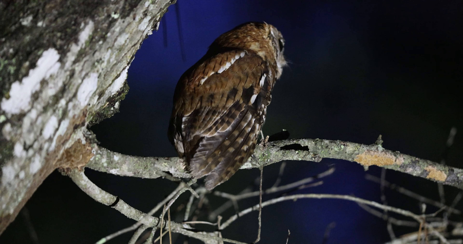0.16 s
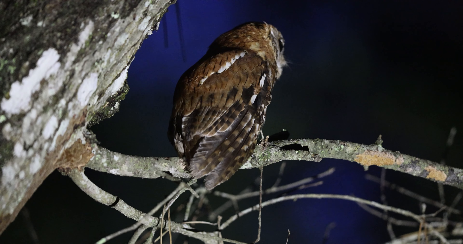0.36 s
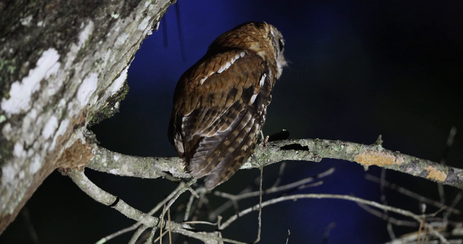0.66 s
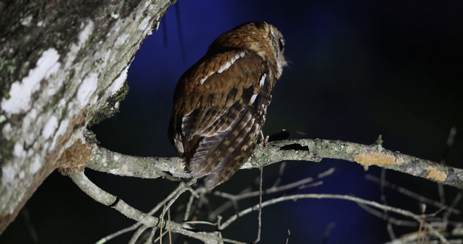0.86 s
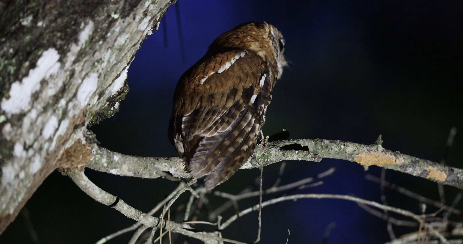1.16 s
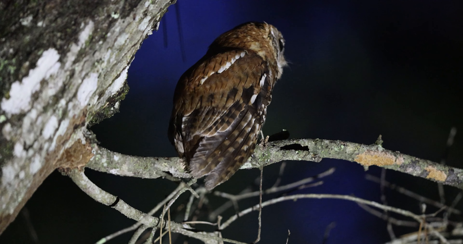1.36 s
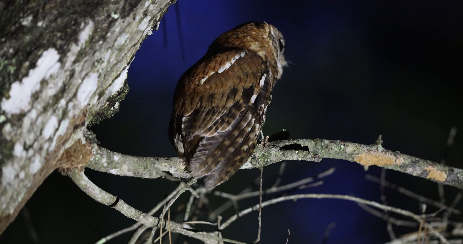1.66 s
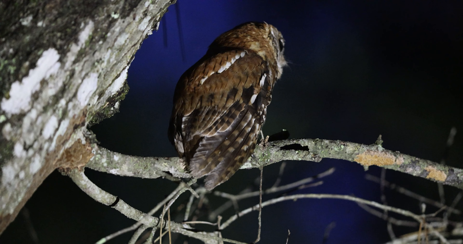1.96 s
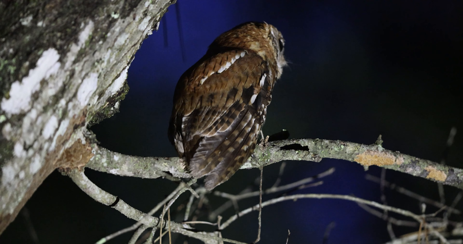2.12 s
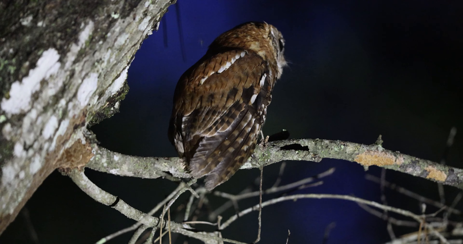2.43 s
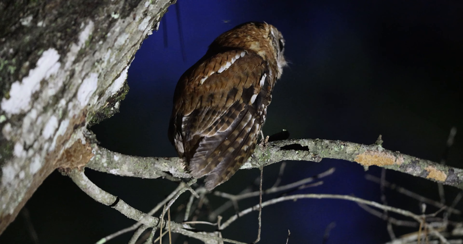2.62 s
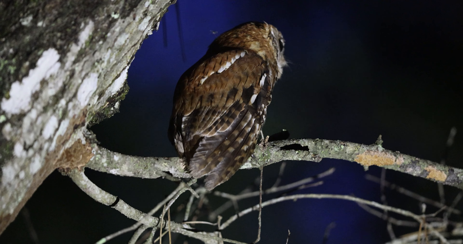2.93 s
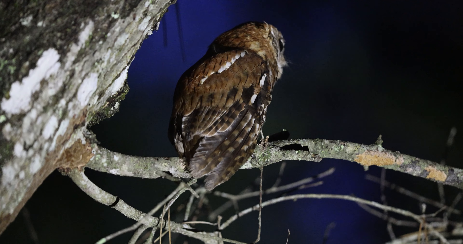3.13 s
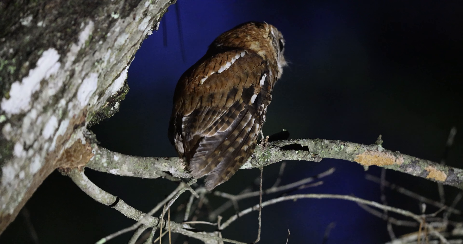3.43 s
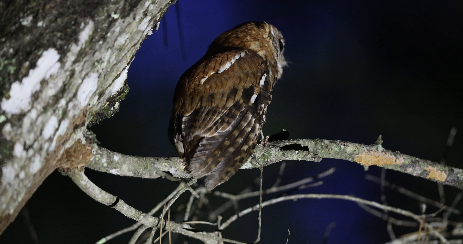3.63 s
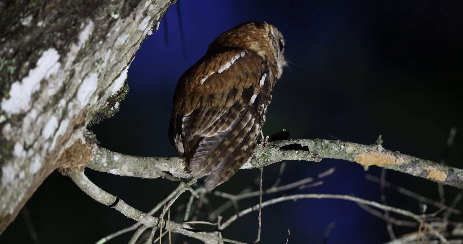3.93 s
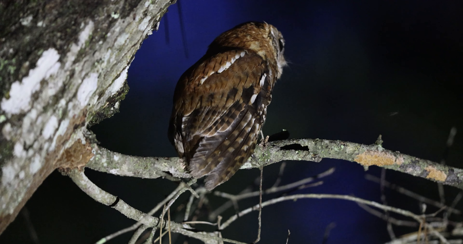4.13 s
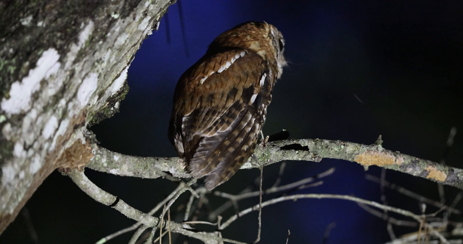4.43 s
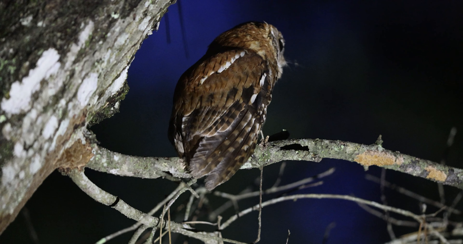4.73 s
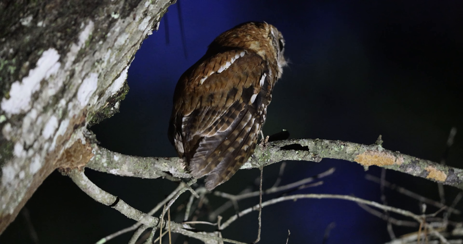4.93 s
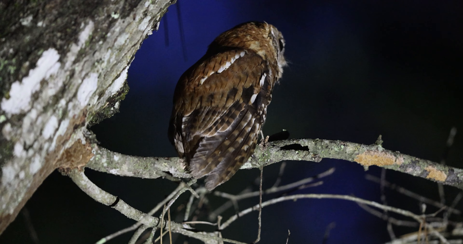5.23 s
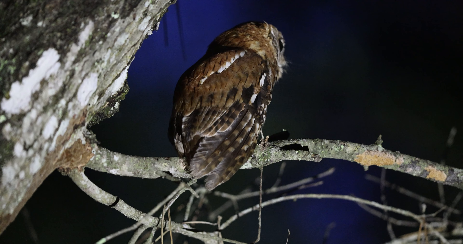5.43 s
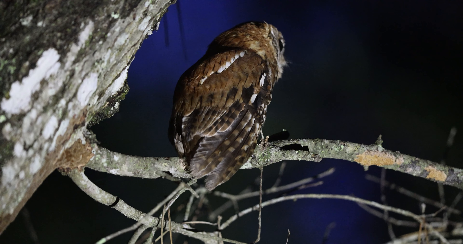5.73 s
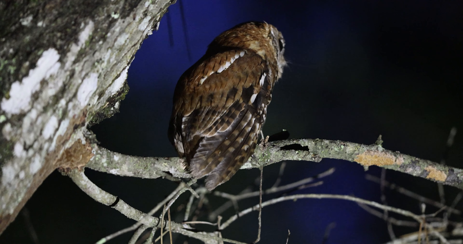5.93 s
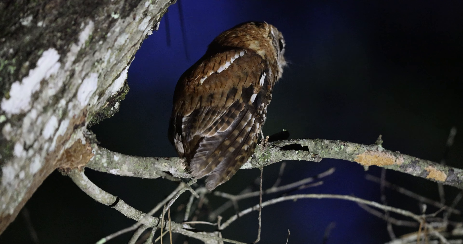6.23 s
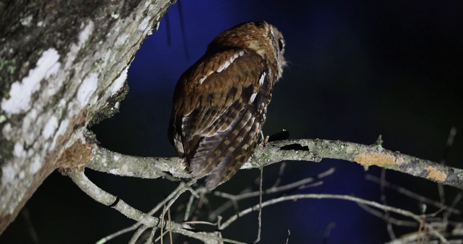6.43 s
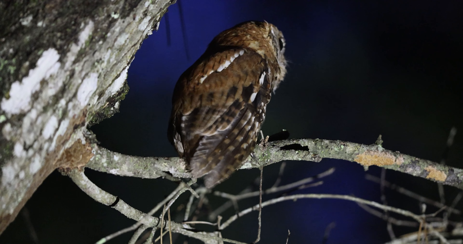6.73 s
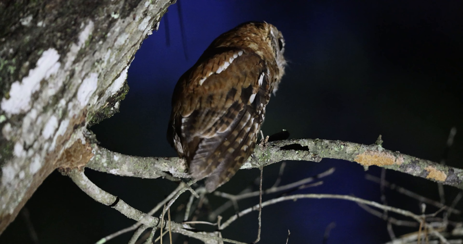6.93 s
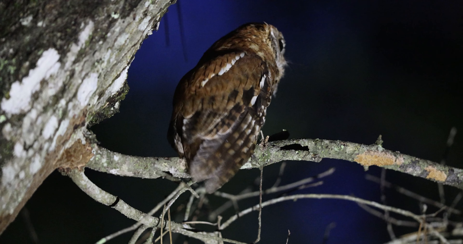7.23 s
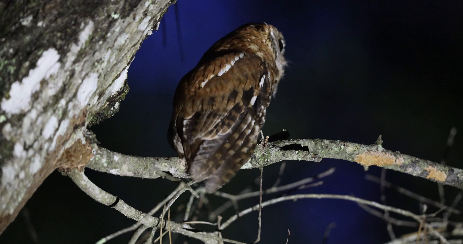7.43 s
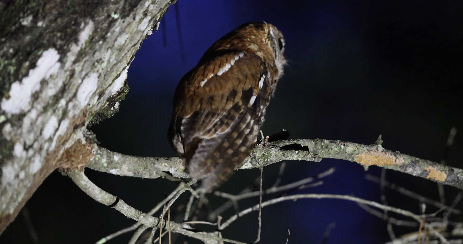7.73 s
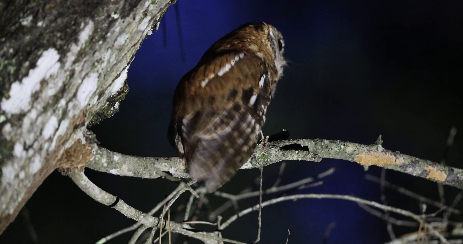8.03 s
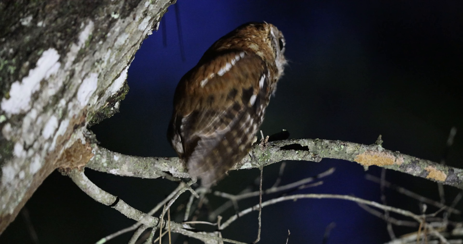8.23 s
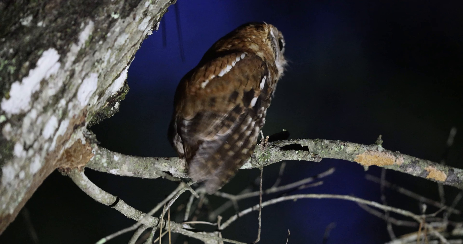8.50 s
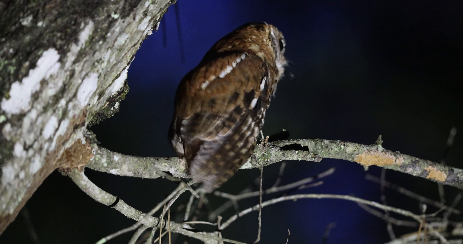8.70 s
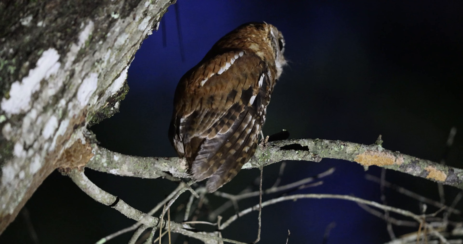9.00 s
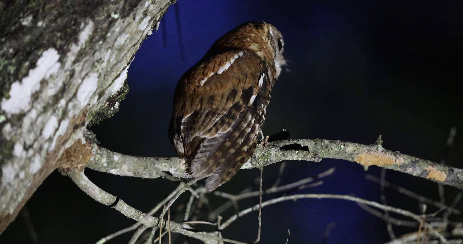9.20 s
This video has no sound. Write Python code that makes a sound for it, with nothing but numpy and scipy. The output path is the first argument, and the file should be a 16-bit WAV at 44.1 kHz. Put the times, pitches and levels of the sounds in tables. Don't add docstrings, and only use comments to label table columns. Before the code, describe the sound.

Shimmering crickets, a buzzing katydid and trilling tree frogs fill a wet night wood before a nearby owl's smooth, quavering hooted trill.

```python
import sys
import numpy as np
from scipy import signal
from scipy.fft import rfft, irfft, next_fast_len
from scipy.io import wavfile
from scipy.ndimage import uniform_filter1d

SR = 44100
rng = np.random.default_rng(int(sys.argv[2]) if len(sys.argv) > 2 else 0)


def persist_wave(psi):
    counts = np.round(np.clip(psi, -1, 1) * 32767).astype(np.int16)
    wavfile.write(sys.argv[1], SR, np.atleast_2d(counts).T)


def undo_db(level):
    steps = np.asarray(level, float) / 20
    return 10 ** steps


N = 412776

# frequency in Hz, density in dB per Hz.
CHORUS_SPECTRUM = [(3470, -62), (5900, -37.5), (6150, -19), (6380, -6), (6640, 7.5), (7010, -3), (7210, -9),
                   (7400, -11), (9620, -33), (16300, -120)]
CHORUS_DB = -44.5
# time in seconds, lead in throbs, depth in dB.
IN_STEP = [(0, 0.37, -3.5), (.6, -0.0079, 1), (.8, -0.42, 4), (1.4, -0.28, 13), (2.15, -0.43, 3),
           (3.2, -0.27, 13), (4.0, -.39, 9), (4.9, -0.37, 9), (5.6, -0.35, 5), (6.1, -.16, 2),
           (6.55, -.22, 7.5), (7.15, -0.12, 11), (8.0, -0.02, 7), (8.5, -0.2, -2), (8.9, -0.013, 3),
           (9.36, 0.11, -1)]
THROBS_PER_S, LEADERS_DB, LEADERS_FLICKER_DB = 3.5, -47.5, 1.48

# frequency in Hz, density in dB per Hz.
HISS_SPECTRUM = [(5000, -26.5), (7300, -0.5), (7510, -4), (8520, -1.5), (9670, -4), (10500, -5.5),
                 (11200, -12), (12300, -11.5), (13500, -26), (14700, -19), (15650, -34)]
HISS_DB = -52
# frequency in Hz, density in dB per Hz.
HUSH_SPECTRUM = [(15, -50), (25, -31), (102, -7.5), (380, -4), (563, -.5), (873, -6.5), (1210, -6.5),
                 (1400, -1.5), (1900, -6), (2700, -9), (3730, -8), (5160, -13.5), (5790, -19), (6600, -30)]
HUSH_DB = -61.5
# time in seconds, level in dB.
ENGINE = [
    (0, -75.5),
    (1.7, -79),
    (2.3, -75),
    (3.5, -70.5),
    (4.9, -77),
    (5.5, -79),
    (9.36, -83),
]
# time in seconds, level in dB.
MOAN = [
    (3.35, -90),
    (3.55, -67),
    (3.75, -67),
    (3.9, -95),
]
# frequency in Hz, width in Hz, level in dB.
FAR_FROGS = [(2995, 175, 0)]

# time in seconds, lead in wing strokes, level in dB.
KATYDID = [(0.2, -0.019, -56), (0.56, -0.063, -56), (1.1, 0.06, -58), (2.0, -0.067, -57), (3.08, 0.15, -57),
           (4.16, -0.17, -58.5), (4.6, -0.2, -57.5), (5.24, -0.0099, -57), (6.1, 0.075, -58),
           (6.7, 0.18, -58), (7.5, 0.23, -60.5), (8.1, 0.11, -58.5), (8.48, 0.02, -61), (9.2, 0.03, -57)]
STROKES_PER_S = 63.8
# share of the stroke, low ring in dB, high ring in dB.
TEETH = [(-.235, 9, -13), (-.125, 3.5, -5), (-.035, 5.5, 4.5), (.055, -1, -7), (.1, 4, -6), (.24, 0, 7)]
# frequency in Hz, width in Hz, level in dB.
WING_LOW = [(8590, 570, -3.5), (9710, 940, 5.5), (9965, 860, 3.5), (10900, 410, -9.5), (12300, 460, -5.5),
            (13700, 970, -15)]
WING_HIGH = [(14500, 340, -0.5)]

# start in seconds, peak in dB.
CHIRPS = [(-.06, -49.5), (.264, -50), (.674, -48.5), (1.028, -48.5), (1.453, -48.5), (1.894, -49),
          (2.26, -50), (2.599, -49.5), (2.971, -48), (3.409, -49), (3.806, -49), (4.214, -49.5),
          (4.674, -50.5), (4.95, -63)]
# seconds into it, pitch in Hz, level in dB.
CHIRP = [(0, 4835, -11), (.012, 4980, -7.5), (.025, 5070, -5), (.05, 4970, -5.5), (.075, 4790, -5.5),
         (.1, 4650, -9), (.125, 4500, -26)]

# start in seconds, end in seconds, pitch in Hz, level in dB.
FROGS = [(.945, .96, 3150, -34.5), (.983, 1.003, 3200, -34.5), (1.0028, 1.623, 3153, -33.5),
         (-.3, .95, 3060, -49.5), (1.62, 1.951, 3060, -63), (1.948, 2.467, 3047, -46.5),
         (2.303, 3.303, 3037, -50.5), (3.33, 4.037, 2962, -45.5), (3.406, 4.044, 3063, -50.5),
         (5.123, 5.948, 3068, -51), (5.135, 5.755, 2922, -62), (5.848, 6.605, 3075, -48),
         (6.131, 6.762, 2997, -48.5), (6.779, 6.961, 3096, -47.5), (6.985, 7.63, 3160, -47),
         (7.47, 8.43, 2990, -44.5), (7.601, 8.4, 3160, -46.5), (8.375, 9.5, 3143, -47.5)]
PULSES_PER_S, HIGHEST_HZ, FASTER_PER_HZ = 66.3, 3156, .008
SLOWING_PER_S2, CREEP_CYCLES = 1.5, .25
NEAREST_DB, NEAR_WANDER, WANDER_PER_DB = -34, .055, .003
NEAR_ECHO_DB, ECHO_PER_DB, MOST_ECHO_DB = -14, .6, -2.5

# start in seconds, end in seconds, level in dB.
RASPS = [
    (-1.6, .25, -60),
    (0.3, .94, -60.5),
    (1.5, 2.66, -61),
    (3, 4.49, -63),
    (5.5, 6.37, -58),
    (6.5, 8.48, -61.5),
]

# start in seconds, level in dB.
NIGHTJAR = [
    (.0, -61),
    (2.25, -59.5),
    (4.735, -60.5),
    (6.74, -59.5),
    (8.87, -59),
]
# seconds into the call, pitch in Hz, level in dB.
NIGHTJAR_STROKES = [
    [(.05, 2370, -36), (.056, 2230, -5.5), (.072, 1745, -3), (.08, 1550, -26)],
    [(.35, 1313, -9), (.365, 1490, 1.5), (.385, 1980, 3), (.397, 2450, -3), (.41, 2310, -3),
     (.435, 1430, -20)],
    [(.43, 1390, -3), (.445, 1485, 1), (.47, 1947, 3), (.495, 1664, 8), (.535, 1640, 10.5),
     (.55, 1640, -24)],
    [(.725, 1400, -43), (.745, 1623, 8), (.765, 1682, 10), (.777, 2390, 0), (.79, 2470, 1), (.812, 1616, 5),
     (.83, 2100, -4), (.89, 1320, -3), (.92, 1190, -11)],
]

# start in seconds, peak in dB.
TWIGS = [(1.027, -57), (2.056, -54.5), (2.513, -60), (4.24, -60), (4.469, -61), (5.0, -62), (6.05, -58),
         (6.621, -56.5), (8.09, -56.5), (8.789, -57), (8.845, -61)]

# share of its length, level in dB, pitch as a ratio, octave in dB.
HOOT = [(-.35, -44, 0.933, -16), (0, -12, .955, -11), (.22, -3, 0.99, -14), (.5, -0.2, 1.004, -17.5),
        (.8, -1.1, 0.972, -17.5), (.92, -2.5, 0.958, -10.5), (1.03, -11, .93, -13),
        (1.15, -19.5, 0.89, -28), (1.5, -26, 0.945, -20)]
# time in seconds, gap to the next hoot in seconds.
PACE = [(6.762, .0719), (6.9, .0786), (7.64, .067), (7.86, .071), (7.93, .0826), (8.2, .0892), (8.6, .0596),
        (8.8, .0586), (8.95, .0648)]
# time in seconds, peak in dB, pitch in Hz.
EFFORT = [(6.76, -48.5, 657), (6.83, -41, 684), (6.909, -37.5, 692), (7.14, -35, 700), (7.6, -36, 693),
          (8.1, -35, 693), (8.62, -35, 685), (8.92, -38.5, 665), (8.985, -45, 643)]
HOOTS = 32
HOOT_BASE_S, HOOT_SHARE_OF_GAP, HOOT_SPREAD_DB = 0.00913, .39, 0.65
TIRES_AT_S, FADE_DB_PER_S = 8.1, 7

WOOD_T60_S = 0.89
# frequency in Hz, width in Hz.
NOTCHES = [(7350, 220), (13900, 320)]


def rms_one(x):
    return x / np.sqrt(np.mean(x ** 2) + 1e-20)


def add(out, sound, s):
    i = round(s * SR)
    part = sound[max(-i, 0):max(N - i, 0)]
    out[max(i, 0):max(i, 0) + len(part)] += part


def along(rows):
    s, *columns = np.transpose(rows)
    t = np.arange(s[0], s[-1], 1 / SR)
    return [np.interp(t, s, column) for column in columns]


def in_time(rows):
    s, *columns = np.transpose(rows)
    t = np.arange(N) / SR
    return [np.interp(t, s, column) for column in columns]


def low_noise(cut_hz, size):
    sos = signal.butter(2, cut_hz, fs=SR, output="sos")
    return rms_one(signal.sosfilt(sos, rng.standard_normal(size + SR))[SR:])


def coloured(spectrum):
    hz, db = np.transpose(spectrum)
    size = next_fast_len(N)
    bin_hz = np.arange(size // 2 + 1) * SR / size
    gain = undo_db(np.interp(np.log(bin_hz + 1), np.log(hz), db, -200, -200))
    return rms_one(irfft(rfft(rng.standard_normal(size)) * gain, size)[:N])


def resonate(x, modes):
    out = 0
    for k, (hz, width_hz, db) in enumerate(modes):
        r = np.exp(-np.pi * width_hz / SR)
        b = (1 - r * r) / 2 * np.array([1, 0, -1])
        a = [1, -2 * r * np.cos(2 * np.pi * hz / SR), r * r]
        out = out + (-1) ** k * undo_db(db) * signal.lfilter(b, a, x)
    return out


def noise_through(*stages):
    x = rng.standard_normal(N)
    for modes in stages:
        x = resonate(x, modes)
    return rms_one(x)


def whistle(rows, starts, lift_db):
    out = np.zeros(N)
    flutter = undo_db(2.2 * low_noise(cut_hz=50, size=N))
    hz, db = along(rows)
    for (s, level_db), change in zip(starts, rng.standard_normal(len(starts))):
        tone = np.sin(np.cumsum(2 * np.pi * hz * (1 + 0.00455 * change) / SR))
        add(out, undo_db(db + level_db + lift_db) * tone, s + rows[0][0])
    return out * flutter


def wood(x):
    t = np.arange(SR) / SR
    build_up = 1 - np.exp(-(t / .022) ** 2)
    clouds = rng.standard_normal((3, SR)) * undo_db(-60 * t / WOOD_T60_S) * build_up
    leaves = np.array([low_noise(cut_hz=60, size=len(x)) for _ in clouds])
    echoes = signal.fftconvolve(x * leaves, clouds / np.linalg.norm(clouds), axes=1)
    return echoes.sum(axis=0)[:N]


def crickets():
    tuned_wing = [(6832, 220, 0)]
    leaders = noise_through(tuned_wing, tuned_wing)
    crowd = coloured(CHORUS_SPECTRUM) * undo_db(CHORUS_DB - 2.5 + low_noise(6.2, N))
    lead, depth_db = in_time(IN_STEP)
    lull = np.sin(np.pi * (THROBS_PER_S * np.arange(N) / SR + lead)) ** 2
    throb_db = depth_db * (.3 - lull) + LEADERS_FLICKER_DB * low_noise(cut_hz=6.8, size=N)
    return crowd + leaders * undo_db(LEADERS_DB + throb_db)


def night_air():
    hush = undo_db(HUSH_DB + 2.0) * coloured(HUSH_SPECTRUM)
    far_katydids = undo_db(HISS_DB - 0.1) * coloured(HISS_SPECTRUM)
    engine = undo_db(in_time(ENGINE)[0] - 1.5) * noise_through([(98, 56, 0)], [(95.5, 60, 0)])
    hum = undo_db(-78.5) * noise_through([(231.0, 7.7, 0)])
    moan = undo_db(in_time(MOAN)[0]) * noise_through([(354, 16, 0)])
    far_frogs = undo_db(-66) * noise_through(FAR_FROGS, FAR_FROGS)
    return hush + far_katydids + engine + hum + moan + far_frogs


def katydid():
    lead, level_db = in_time(KATYDID)
    stroke = STROKES_PER_S * np.arange(N) / SR + lead
    clicks = np.zeros((2, N))
    for share, low_db, high_db in TEETH:
        at = np.flatnonzero(np.diff(np.floor(stroke - share)) > 0)
        slip, strength = rng.standard_normal((2, 700))[:, :at.size]
        at = np.clip(at + np.round(3.5 * slip), 0, N - 1).astype(int)
        clicks[:, at] += undo_db(np.array([[low_db], [high_db]]) + 0.88 * strength)
    return undo_db(level_db + 30) * (resonate(clicks[0], WING_LOW) + resonate(clicks[1], WING_HIGH))


def chirping_cricket():
    return whistle(CHIRP, CHIRPS, lift_db=-0.5)


def frogs():
    out, echo = np.zeros((2, N))
    air = np.array([low_noise(cut_hz=23, size=N), low_noise(cut_hz=40, size=N)])
    creep = CREEP_CYCLES * low_noise(cut_hz=4.0, size=N)
    for k, (s, end, hz, level_db) in enumerate(FROGS):
        per_s = PULSES_PER_S + FASTER_PER_HZ * max(HIGHEST_HZ - hz, 0)
        fainter_db = max(NEAREST_DB - level_db, 0)
        wander = NEAR_WANDER + WANDER_PER_DB * fainter_db
        echo_db = min(NEAR_ECHO_DB + ECHO_PER_DB * fainter_db, MOST_ECHO_DB)
        length_s = np.ceil(abs(end - s) * per_s - .5) / per_s
        t = np.arange(round(length_s * SR)) / SR
        beat = per_s * t + SLOWING_PER_S2 / 2 * t * (t[-1] - t)
        since, began = beat % 1 / per_s, np.floor(beat) / per_s
        filling = np.exp(-(began / .1) ** 2)
        sag_hz = 510 * np.exp(-(wander / .06) ** 2)
        steady_hz = hz * (1 - .04 * filling) - sag_hz / 4
        cycles = steady_hz * since + sag_hz * .0035 * (1 - np.exp(-since / .0035))
        shape = np.abs(np.sin(np.pi * np.clip(since / 0.0102, 0, 1))) ** 0.85
        part = slice(k * 16000, k * 16000 + len(t))
        swell, shift = air[:, part] * wander
        tone = np.sin(2 * np.pi * (cycles + 0.93 * shift + creep[part]))
        trill = undo_db(level_db - 7.6 * filling + 12.0 * swell) * shape * tone
        add(out, trill, s)
        add(echo, undo_db(echo_db) * trill, s)
    return out, echo


def rasps():
    low_pass = signal.cheby1(6, 1, 520, fs=SR, output="sos")
    grain = signal.sosfilt(low_pass, 6 * rng.standard_normal(N))
    out = np.zeros(N)
    for k, (s, end, level_db) in enumerate(RASPS):
        rise = np.linspace(0, 1, round(abs(end - s) * SR))
        centre_hz = 3450 + 520 * np.clip(rise / .68, 0, 1)
        band = grain[k * 60000:][:len(rise)] * np.cos(np.cumsum(2 * np.pi * centre_hz / SR))
        throb = np.cos(np.cumsum(np.pi * (105 - 22 * rise) / SR)) ** 2 + 0.95
        swell_db = -13.5 * np.clip(1 - rise / 0.79, 0, 1) - 4.0 * rise ** 4
        add(out, undo_db(level_db + swell_db) * band * throb, s)
    return out


def nightjar():
    return sum(whistle(stroke, NIGHTJAR, lift_db=4.0) for stroke in NIGHTJAR_STROKES)


def twigs():
    out = np.zeros(N)
    t = np.arange(SR // 20) / SR
    for s, peak_db in TWIGS:
        burst = undo_db(peak_db + 15.5) * rng.standard_normal(len(t)) * np.exp(-t / 0.012)
        add(out, resonate(burst, [(977, 600, 3.5), (2250, 1200, 1.0)]), s)
    return out


def owl():
    out, s = np.zeros(N), PACE[0][0]
    when, level_db, pitch_hz = np.transpose(EFFORT)
    for change in rng.standard_normal(HOOTS):
        gap = np.interp(s, *np.transpose(PACE))
        length = HOOT_BASE_S + HOOT_SHARE_OF_GAP * gap
        db, ratio, octave_db = along([(share * length, *rest) for share, *rest in HOOT])
        late = np.clip(np.linspace(-2.2, 3.2, len(db)), 0, 1)
        db = db - FADE_DB_PER_S * max(s - TIRES_AT_S, 0) * late
        phase = np.cumsum(2 * np.pi * np.interp(s, when, pitch_hz) * ratio / SR)
        voice = np.sin(phase) + undo_db(octave_db) * np.sin(2 * phase)
        peak = undo_db(np.interp(s, when, level_db) + HOOT_SPREAD_DB * change)
        envelope = uniform_filter1d(undo_db(db), size=130)
        add(out, peak * envelope * voice, s + HOOT[0][0] * length)
        s += gap
    return out


def scene():
    background = crickets() + night_air() + katydid() + rasps() + twigs()
    chirps = chirping_cricket()
    pond, pond_echo = frogs()
    far_bird = nightjar()
    near_bird = owl()
    scattered = far_bird - resonate(far_bird, [(1640, 230, -3.5)])
    chirps_echo = undo_db(2.0) * resonate(chirps, [(4850, 380, 0.0017)])
    echo = wood(undo_db(-28.5) * near_bird + pond_echo + undo_db(4.5) * scattered + chirps_echo)
    whole = background + chirps + pond + far_bird + near_bird + echo
    return whole[None]


def band_limit(x):
    return signal.sosfilt(signal.butter(12, 15700, fs=SR, output="sos"), x)


def record(dry):
    for hz, width_hz in NOTCHES:
        b, a = signal.iirnotch(hz, hz / width_hz, fs=SR)
        dry = signal.lfilter(b, a, dry)
    return band_limit(dry)


dry = scene()
out = record(dry)
persist_wave(out)
```